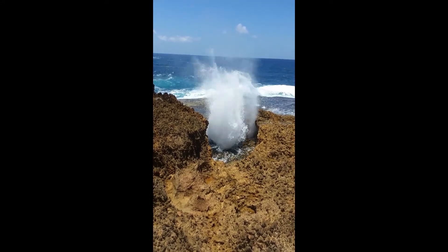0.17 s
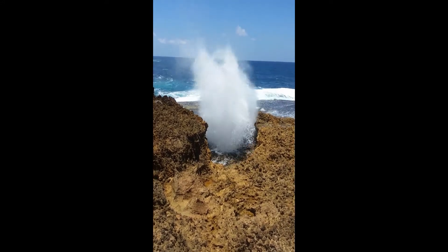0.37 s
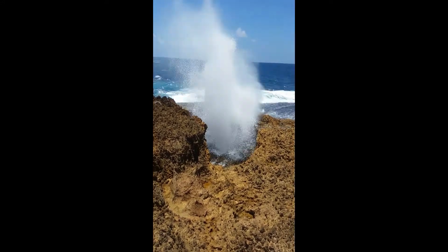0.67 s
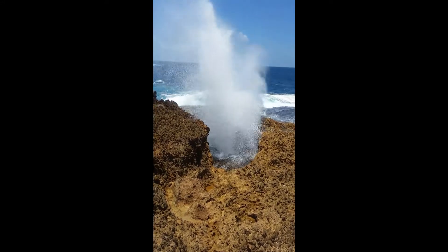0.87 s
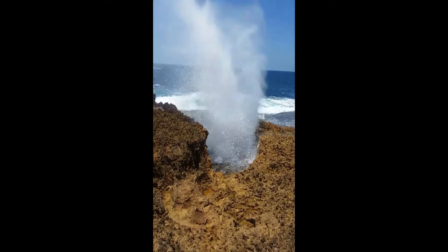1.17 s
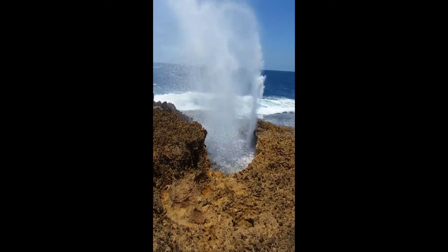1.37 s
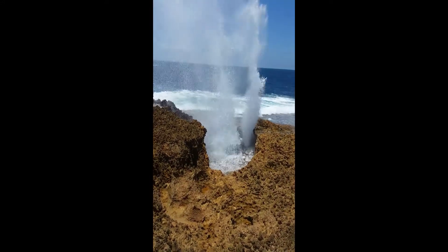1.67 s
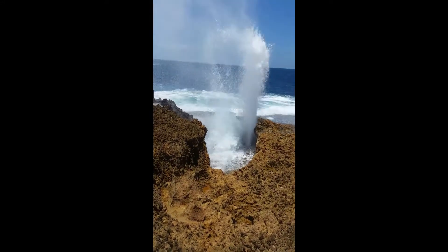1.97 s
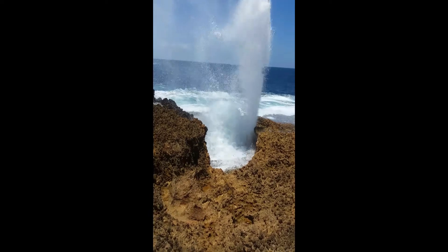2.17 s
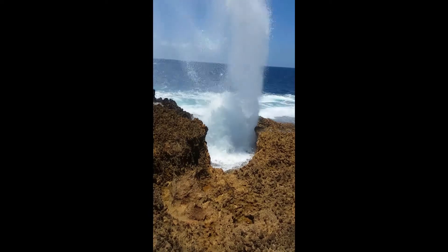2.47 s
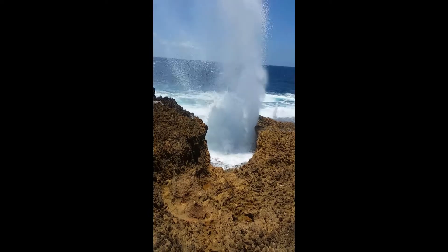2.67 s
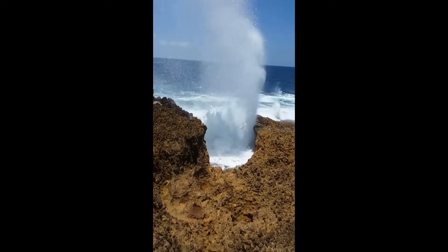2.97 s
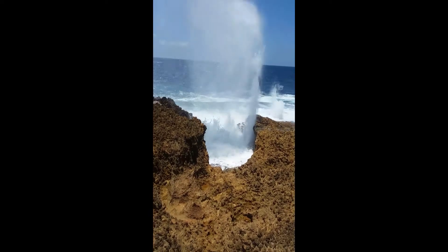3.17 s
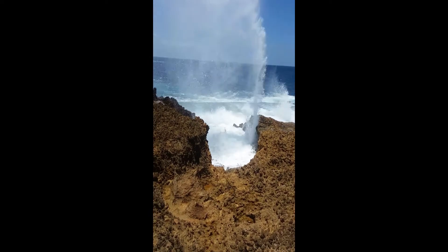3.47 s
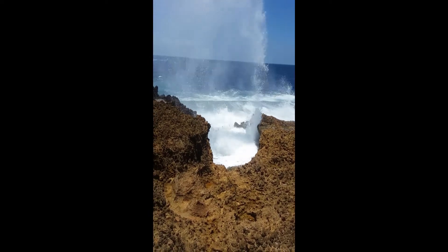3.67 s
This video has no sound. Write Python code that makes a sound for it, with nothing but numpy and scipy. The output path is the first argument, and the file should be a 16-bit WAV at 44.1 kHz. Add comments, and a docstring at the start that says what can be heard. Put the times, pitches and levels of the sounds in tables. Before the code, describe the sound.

A blowhole on a rocky shore booms low and hollow, blasts a roaring jet, drops off, then surges again more softly; spray hisses, surf washes behind, and wind knocks the microphone a few metres away.

```python
"""A blowhole in a rocky shore booms and spouts twice, heard from a few metres away in a sea breeze.
Each surge makes the cave under the rock boom and drives a roaring jet through the hole; spray hisses
and patters back on the rock. Surf washes behind, and wind rumbles and knocks on the microphone.
Air and water are coloured noise, the hollow tones are noise through resonances, and drops are ticks."""
import sys
import numpy as np
from scipy import signal
from scipy.fft import rfft, irfft
from scipy.io import wavfile
from scipy.ndimage import uniform_filter1d

SR = 44100
rng = np.random.default_rng(int(sys.argv[2]) if len(sys.argv) > 2 else 0)


def transcribe(signal):
    """Save signal, clipped to [-1, 1], as a 16-bit WAV file at the path in sys.argv[1]."""
    frames = np.atleast_2d(signal).T
    limited = np.clip(frames, -1, 1)
    pcm = np.round(limited * 32767).astype(np.int16)
    wavfile.write(sys.argv[1], SR, pcm)


N = 168462
T = np.arange(N) / SR  # time in seconds
HZ = np.maximum(np.fft.rfftfreq(N, 1 / SR), 1)  # the frequencies of the spectrum, kept above zero
WIND_LIKENESS = 0.1  # how alike wind noise is in left and right, -1 to 1


def undb(db):
    """Turn decibels into a gain."""
    return 10 ** (np.asarray(db) / 20)


def curve(table, order=1):
    """Draw a gain over time from one dB column of a table."""
    rows = np.array(table)
    return undb(np.interp(T, rows[:, 0], rows[:, order]))


def across(table, order=1):
    """Spread one column of a table over frequency, in straight lines on a log scale."""
    rows = np.array(table)
    return np.interp(np.log(HZ), np.log(rows[:, 0]), rows[:, order])


def walk(rate):
    """Wander randomly: levels held for 1 / rate seconds, smoothed twice and scaled to a spread of 1."""
    hold = max(int(SR / rate), 1)
    steps = np.repeat(rng.standard_normal(N // hold + 1), hold)
    slow = uniform_filter1d(uniform_filter1d(steps, hold), hold)[:N]
    return slow / slow.std()


def noise():
    """Make two unrelated white noises."""
    return rng.standard_normal((2, N))


def pan(db):
    """Give left and right gains that differ by this many dB; their mean is 1."""
    gains = undb(np.array([[1], [-1]]) * db / 2)
    return gains / gains.mean()


def shape(source, gain, likeness=None):
    """Colour two unrelated signals and blend them into left and right; the middle has rms 1."""
    # The two channels. Each row: frequency in Hz, likeness of left and right from -1 to 1,
    # left minus right in dB.
    stereo = [(40, 0.65, -3), (118, 1, 2.7), (290, 0.92, 0), (680, 0.9, 1.3), (1350, 0.86, -1),
              (2240, 0.61, 0.5), (3330, 0.18, 5.5), (4650, 0.26, -4.5), (7500, -0.18, 2), (10000, -.15, -3),
              (14000, -.08, 5.5)]
    alike = np.clip(across(stereo) if likeness is None else likeness, -1, 1)
    blend = np.sqrt([1 + alike + 0 * HZ, 1 - alike + 0 * HZ])
    mid, side = rfft(source) * gain * blend
    left_right = np.array([mid + side, mid - side]) * pan(across(stereo, order=2))
    out = irfft(left_right, N)
    return out / out.mean(0).std()


def steady(x, span_s):
    """Even out the slow chance swells of a turbulent sound."""
    power = uniform_filter1d(x.mean(0) ** 2, max(int(span_s * SR), 1))
    return x / np.sqrt(np.abs(power) + 1e-9)


def resonate(modes):
    """Let turbulence ring broad, steep-sided air resonances."""
    power = 0
    for hz, width, db in modes:
        detune = (HZ / hz - hz / HZ) * hz / width / np.sqrt(2)
        power = power + undb(db) ** 2 / (1 + detune ** 2) ** 2
    return steady(shape(noise(), np.sqrt(power)), span_s=.09)


def droplets():
    """Tick densely like drops on rock, a few large and many small, in a smooth hiss."""
    drops_per_s, drop_spread_db = 7000, 3
    drop_share = 0.37  # part of the power that is ticks; the rest is smooth hiss
    lands = rng.random((2, N)) < drops_per_s / SR
    size = np.minimum(rng.exponential(size=(2, N)), 2 * np.pi)
    ticks = lands * np.sign(noise()) * undb(drop_spread_db * size)
    return np.sqrt(drop_share) * ticks / ticks.std() + np.sqrt(1 - drop_share) * noise()


def cave():
    """The surge booms in the cave, growls in its throat and sounds a hollow note at the mouth."""
    # Loudness of the boom, the growl and the hollow note. Each row: time in seconds,
    # level in dB (the boom gets a trim below).
    boom_levels = [(0.0, -14), (0.18, -17.5), (0.21, -28), (0.3, -14.5), (0.94, -14.5), (1.03, -20.5),
                   (1.15, -14.5), (1.55, -29), (1.61, -18), (1.86, -21.5), (1.9, -11.5), (2.0, -19),
                   (2.35, -13), (2.37, -17), (3.04, -14), (3.1, -21.5), (3.23, -16), (3.27, -25.5),
                   (3.78, -30), (3.82, -18)]
    throat_levels = [(0, -20), (.12, -22), (.46, -25), (.55, -15), (.65, -13.5), (.85, -14), (1.18, -16.5),
                     (1.26, -33), (1.5, -37), (1.68, -24.5), (1.8, -29), (2.0, -19.5), (2.25, -22),
                     (2.5, -20), (2.75, -18), (2.98, -15.5), (3.07, -27), (3.3, -32), (3.58, -32.5),
                     (3.82, -25)]
    mouth_levels = [(0, -24), (.25, -21), (.45, -23.5), (.62, -20.5), (1.0, -18), (1.21, -20.5),
                    (1.27, -56), (1.9, -33.5), (2.5, -35), (2.75, -34.5), (3.0, -23), (3.08, -40),
                    (3.82, -50)]
    # Air resonances of the three parts. Each row: frequency in Hz, width in Hz, relative level in dB.
    cave_modes = [(115.9, 35.8, 3), (143, 30, -1.5)]
    throat_modes = [(177, 38, -0.44), (212.7, 42, -0.18)]
    mouth_modes = [(259.3, 26, 0)]
    boom_trim_db = 1
    boom = resonate(cave_modes) * curve(boom_levels) * undb(boom_trim_db)
    growl = resonate(throat_modes) * curve(throat_levels)
    hollow_note = resonate(mouth_modes) * curve(mouth_levels)
    return boom + growl + hollow_note


def jet():
    """Air and slugs of water churn through the hole: coloured noise with a quickly wavering level."""
    # Loudness of the rush. Each row: time in seconds, level in dB before trim and churn.
    jet_levels = [(0, -37), (.42, -39), (.6, -35.5), (.78, -37.5), (.99, -32), (1.22, -41), (1.6, -41),
                  (2.13, -41.5), (2.5, -36.5), (2.7, -38), (3.02, -39.5), (3.38, -36.5), (3.6, -39),
                  (3.82, -45)]
    # Colour of the rush. Each row: frequency in Hz, relative level in dB per Hz.
    jet_colour = [(150, -8), (300, 1), (365, -5), (460, -1), (590, 0), (710, 0.5), (840, -4.5), (1000, -3),
                  (1400, -5.5), (1700, -8), (2300, -8), (2800, -17), (5000, -17.5), (12000, -59)]
    trim_db, churn_db = 5.5, 1.1
    rush = shape(noise(), undb(across(jet_colour))) * curve(jet_levels)
    return rush * undb(trim_db + churn_db * walk(70))


def spray():
    """Coarse drops hiss and fine mist sizzles above them; both flutter together."""
    # Loudness of the spray. Each row: time in seconds, level of the hiss in dB,
    # level of the finest mist in dB, both before trim and flutter.
    spray_levels = [(0, -43, -40.5), (.15, -45, -44.5), (.3, -43.5, -40), (.44, -43, -42),
                    (.56, -41.5, -40), (.69, -42, -43), (.74, -47.5, -45), (.9, -43.5, -44),
                    (1.08, -46.5, -43), (1.18, -46.5, -46.5), (1.58, -46, -44.5), (2.0, -43.5, -42),
                    (2.2, -44.5, -41.5), (2.36, -41.5, -38.5), (2.6, -44.5, -41.5), (2.87, -42.5, -42.5),
                    (3.01, -46.5, -44), (3.12, -42, -40.5), (3.47, -41.5, -40), (3.64, -47, -45.5),
                    (3.73, -43, -42.5), (3.82, -46, -46)]
    # Colours of hiss and mist. Each row: frequency in Hz, relative level in dB per Hz.
    hiss_colour = [(1200, -21), (2400, -5), (3300, -2), (4000, -1.5), (4900, 1), (5800, -1), (6700, -3.5),
                   (8000, -3), (9500, -6), (10800, -9), (13000, -13), (16000, -25)]
    mist_colour = [(4000, -48), (8000, -6), (10900, -6.5), (12300, 0.5), (14000, -1), (16000, -3)]
    hiss_trim_db, mist_trim_db, flutter_db = 4.5, 3, 1.2
    hiss = shape(droplets(), undb(across(hiss_colour))) * curve(spray_levels) * undb(hiss_trim_db)
    mist = shape(droplets(), undb(across(mist_colour))) * curve(spray_levels, order=2)
    mist = mist * undb(mist_trim_db)
    return (hiss + mist) * undb(flutter_db * walk(44.92))


def surf():
    """Breakers wash steadily beyond the rocks: coloured noise that swells only a little."""
    # Colour of the wash. Each row: frequency in Hz, relative level in dB per Hz.
    surf_colour = [(40, 1), (130, 1.5), (300, -12), (600, -13), (1200, -7.5), (2200, -6), (3000, -31),
                   (8000, -41), (16000, -45)]
    level_db, swell_db = -41.5, 1.4
    return shape(noise(), undb(across(surf_colour))) * undb(level_db + swell_db * walk(3.8))


def wind():
    """Gusts rumble on the microphone: low noise, nearly unrelated in left and right."""
    # Strength of the gusts. Each row: time in seconds, level in dB before the trim.
    wind_levels = [(0, -26), (.1, -29), (.22, -21.5), (.36, -35), (.55, -23), (.75, -40), (1.02, -27.5),
                   (1.2, -31), (1.36, -35.5), (1.52, -27.5), (1.7, -27), (2.3, -31.5), (2.4, -32),
                   (2.48, -26), (2.58, -22), (2.78, -34), (3.0, -25), (3.14, -30), (3.27, -22.5),
                   (3.53, -28), (3.82, -24)]
    # Colour of the rumble. Each row: frequency in Hz, relative level in dB per Hz.
    wind_colour = [(10, -12), (25, -2), (45, 3.5), (70, 12.5), (110, -1.5), (200, 0), (400, -12),
                   (1200, -47), (4000, -75)]
    trim_db = 0.5
    rumble = shape(noise(), undb(across(wind_colour)), WIND_LIKENESS)
    return steady(rumble, span_s=0.206) * curve(wind_levels) * undb(trim_db)


def buffets():
    """Eddies flutter dully on one port of the microphone at a time, with sharp swings of pressure."""
    # Eddies that hit a port. Each row: start in seconds, fading length in seconds, level in dB,
    # extra left minus right in dB.
    eddies = [(0.202, 0.036, -24.5, -9), (1.555, 0.053, -26, 3), (2.098, 0.016, -18, -15),
              (3.627, 0.029, -21, -20), (3.679, 0.026, -24, 15), (3.74, 0.053, -21.5, 27)]
    # Their sharpest knocks. Each row: time of the peak in seconds, peak in dB, left minus right in dB.
    knocks = [(1.583, -17, -18), (2.103, -17.5, -16), (3.620, -13, -26), (3.6287, -15, -20),
              (3.755, -18, 22), (3.807, -19, -6)]
    # Colour of the flutter. Each row: frequency in Hz, relative level in dB per Hz.
    buffet_colour = [(30, -10), (90, 4), (250, 0.5), (370, -2), (510, -8), (700, -19.5), (1100, -21.5),
                     (2000, -40), (5000, -70)]
    attack_s, knock_s = 0.00089, 0.00045
    flutter = shape(noise(), undb(across(buffet_colour)), WIND_LIKENESS)
    flutter = steady(flutter, span_s=0.0214)
    out = np.zeros((2, N))
    for at, length, db, pan_db in eddies:
        age = np.maximum(T - at, 0)
        swell = (1 - np.exp(-age / attack_s)) * np.exp(-(age / length) ** 2 / 2)
        out += undb(db) * pan(pan_db) * flutter * swell
    for at, db, pan_db in knocks:
        # one peak of pressure with a dip on either side
        spread = ((T - at) / knock_s) ** 2
        out += undb(db) * pan(pan_db) * (1 - spread) * np.exp(-spread / 2)
    return out


def blast():
    """At full force the jet rings the air in the shaft, then stops short."""
    # Hardest blasts of the jet. Each row: start in seconds, end in seconds, level in dB.
    blasts = [(0.518, 0.73, -30), (0.742, 0.822, -29.5), (0.845, 1.166, -29), (2.426, 2.617, -38.5),
              (2.81, 2.988, -36.5)]
    # Resonances of the shaft. Each row: frequency in Hz, width in Hz, relative level in dB.
    shaft_modes = [(460, 59, 3), (710, 100, 2), (985, 105, -2), (1130, 130, -7), (1960, 760, -12.5),
                   (4940, 1400, -17)]
    edge_s = 0.017  # softness of each start and stop
    force = np.zeros(N)
    for start, end, db in blasts:
        opening = np.tanh((T - start) / edge_s)
        closing = np.tanh((T - end) / edge_s)
        force += undb(db) * (opening - closing) / 2
    return resonate(shaft_modes) * force


def spatters():
    """Sheets of drops land on the rock close by, to the left: short swells of bright ticks."""
    # Sheets of spray. Each row: middle in seconds, length in seconds (spread of a bell curve),
    # level in dB, extra left minus right in dB.
    sheets = [(2.29, .03, -38, 3), (3.105, .022, -33, 5)]
    # Colour of the drops. Each row: frequency in Hz, relative level in dB per Hz.
    spatter_colour = [(2000, -28), (5000, -12), (10000, -4), (12500, -3), (16000, -3)]
    swell = np.zeros((2, N))
    for at, length, db, pan_db in sheets:
        swell += np.exp(-((T - at) / length) ** 2 / 2) * undb(db) * pan(pan_db)
    return shape(droplets(), undb(across(spatter_colour))) * swell


def scene():
    """Add up the blowhole in front of the surf, with wind on the microphone."""
    blowhole = cave() + jet() + spray() + blast() + spatters()
    return blowhole + surf() + wind() + buffets()


def record(dry):
    """Round off the highest peaks and cut the treble steeply at the top."""
    top_hz = 15950
    rounded = dry / (1 + dry ** 8) ** (1 / 8)
    low_pass = signal.ellip(10, .1, 80, top_hz, fs=SR, output="sos")
    return signal.sosfilt(low_pass, rounded)


dry = scene()
out = record(dry)
transcribe(out)
```